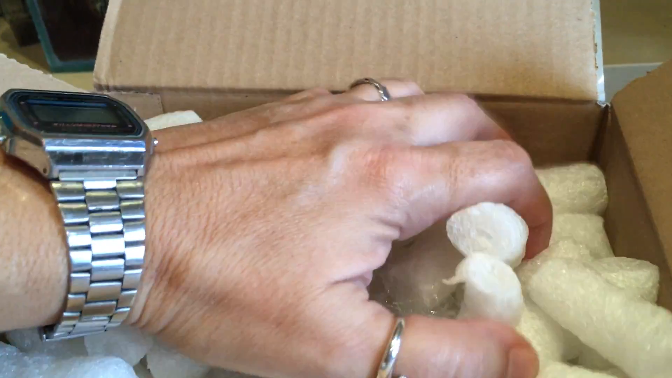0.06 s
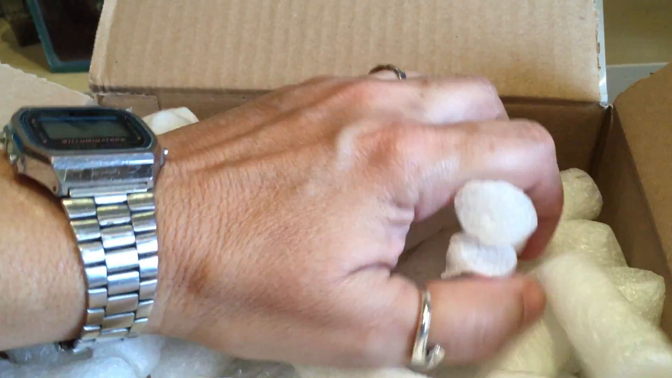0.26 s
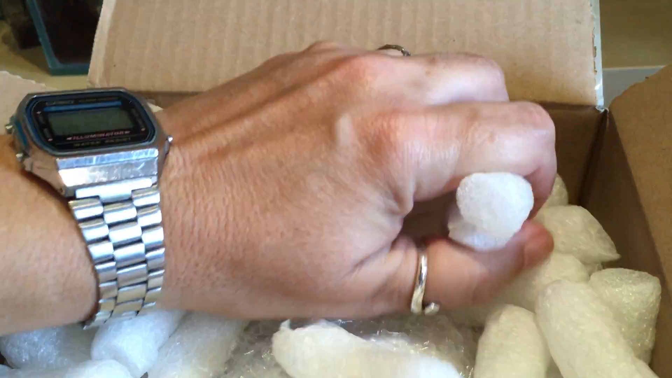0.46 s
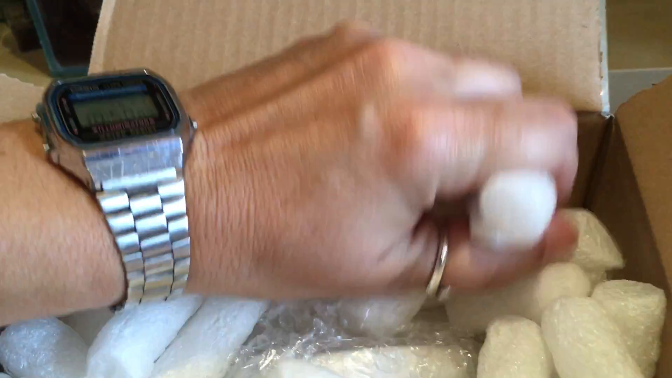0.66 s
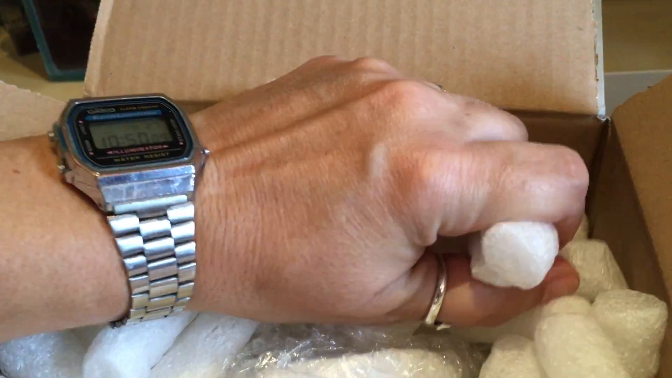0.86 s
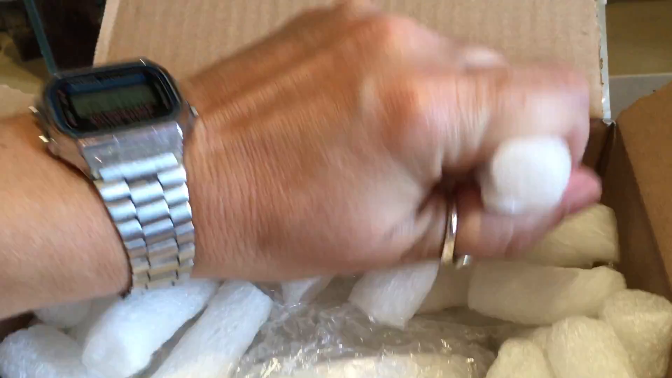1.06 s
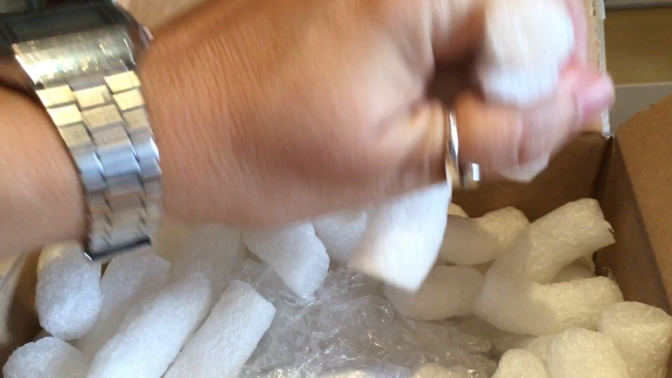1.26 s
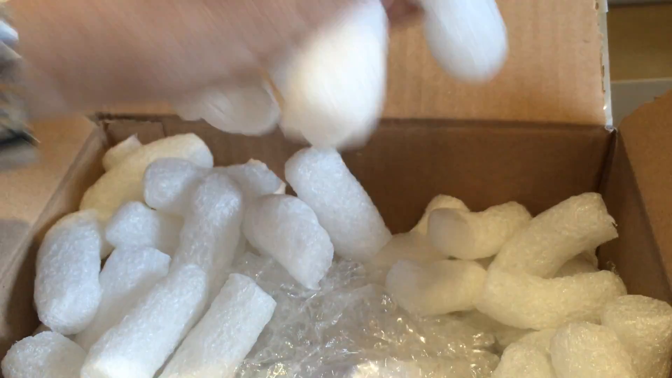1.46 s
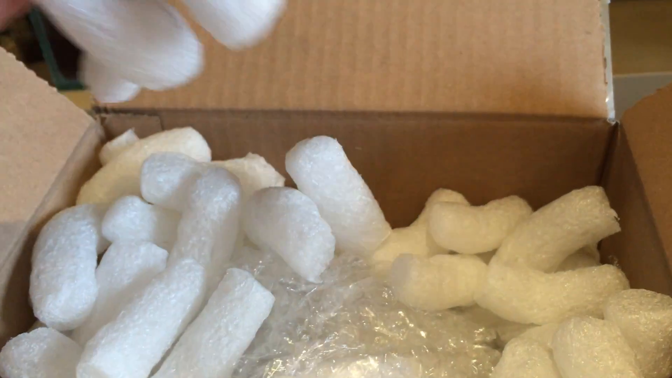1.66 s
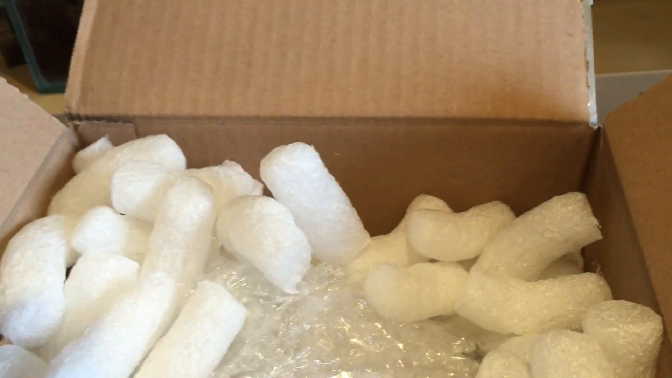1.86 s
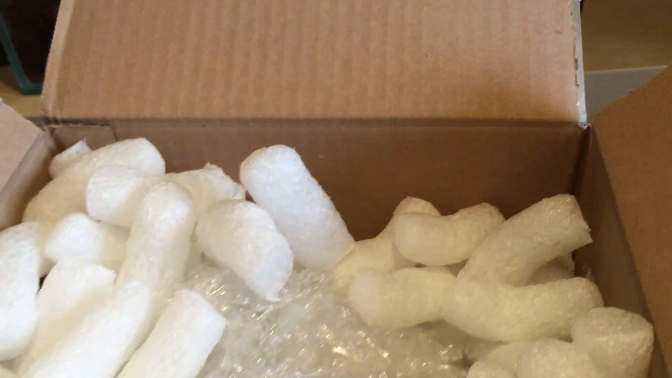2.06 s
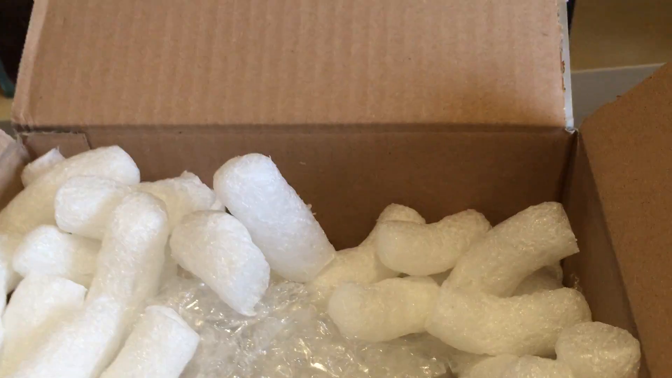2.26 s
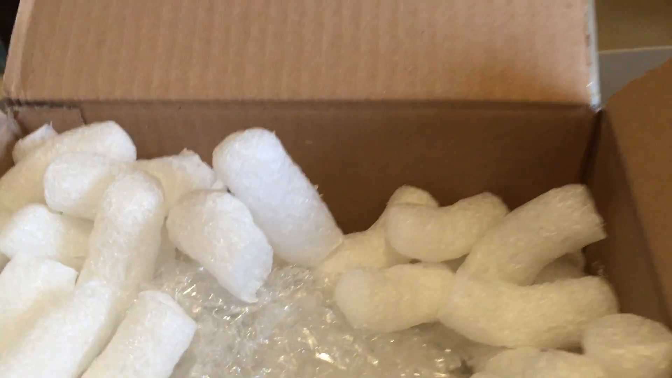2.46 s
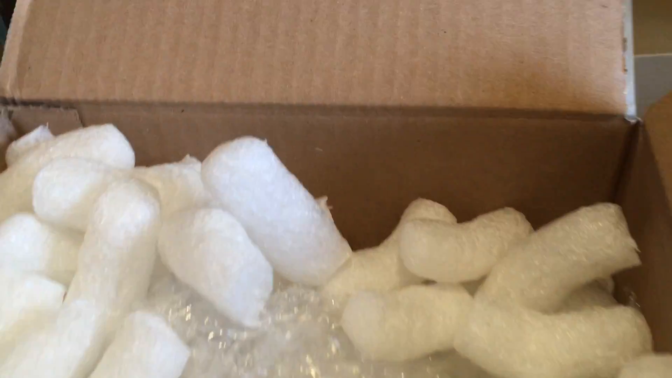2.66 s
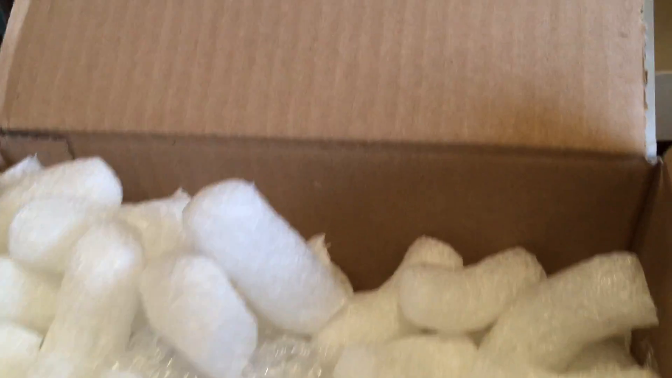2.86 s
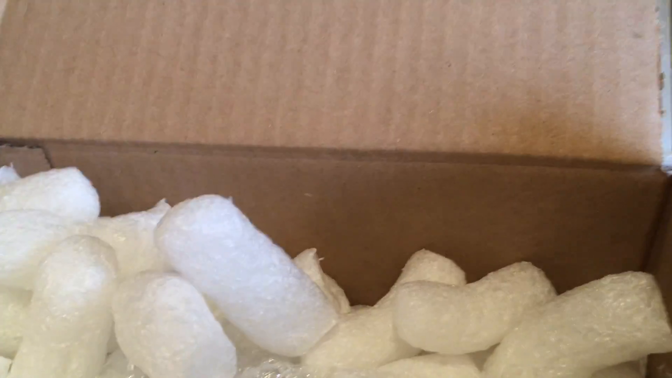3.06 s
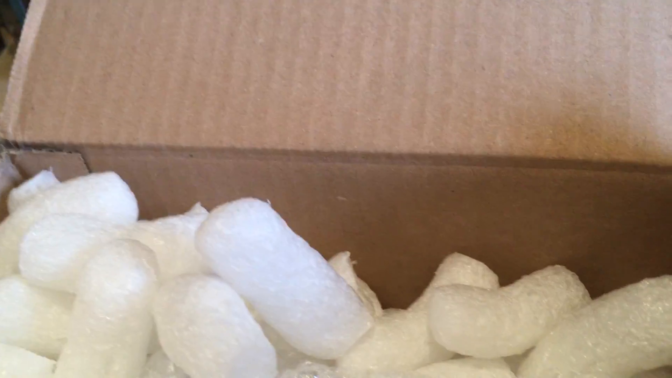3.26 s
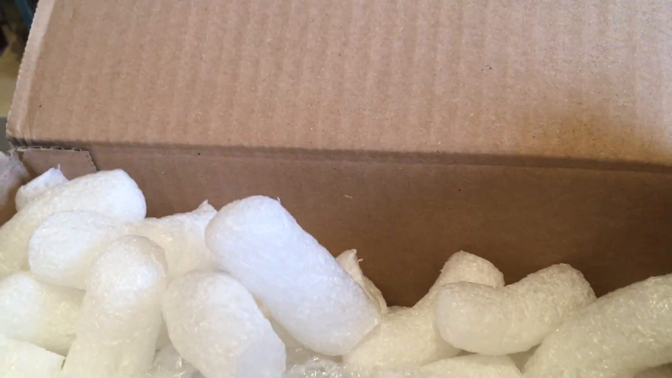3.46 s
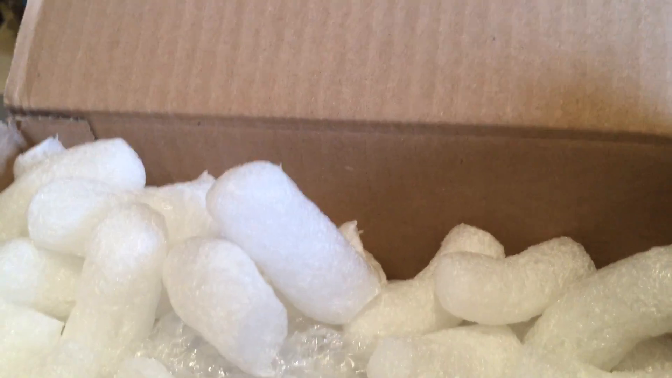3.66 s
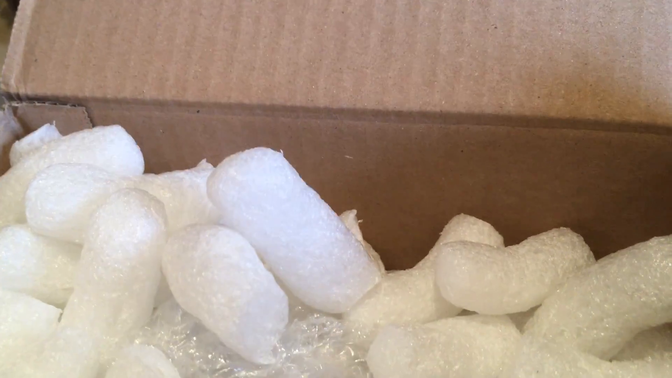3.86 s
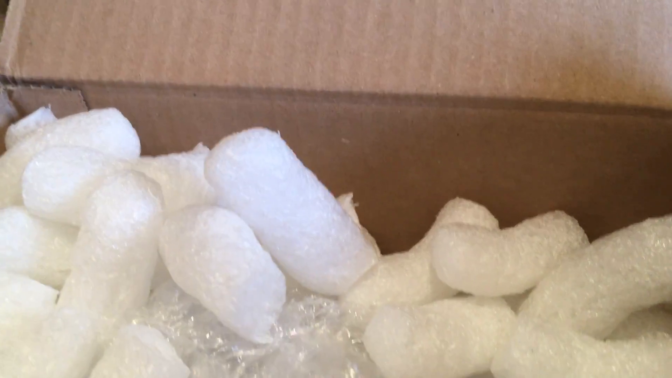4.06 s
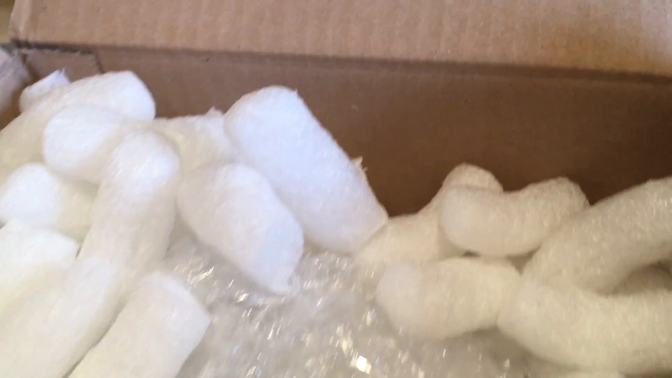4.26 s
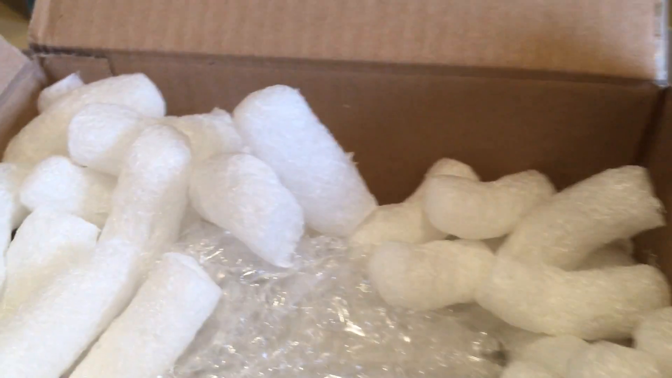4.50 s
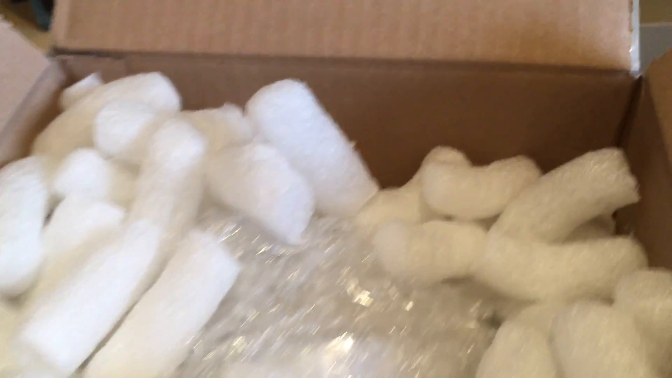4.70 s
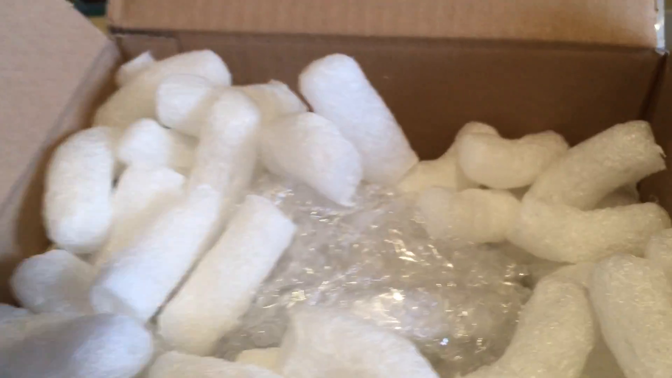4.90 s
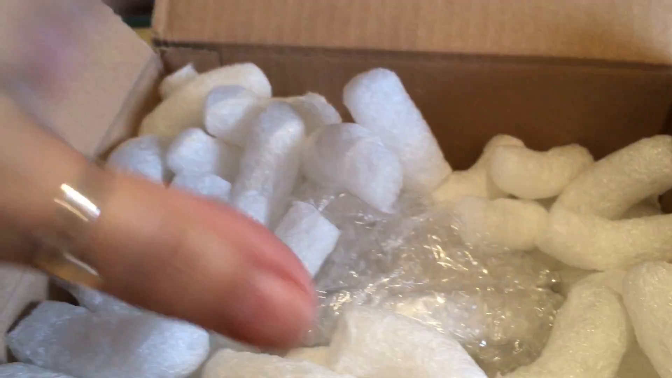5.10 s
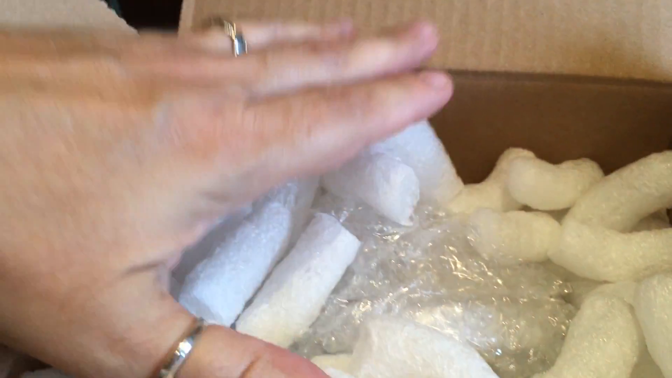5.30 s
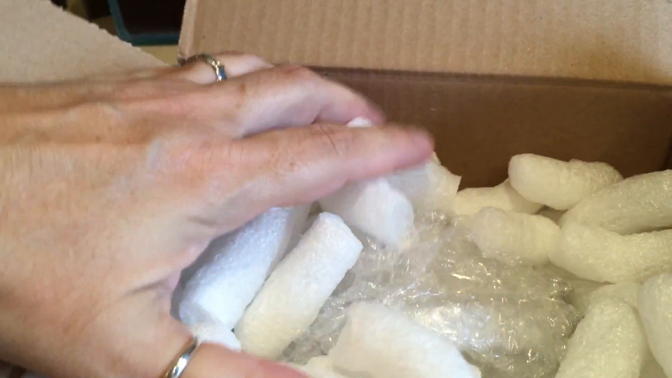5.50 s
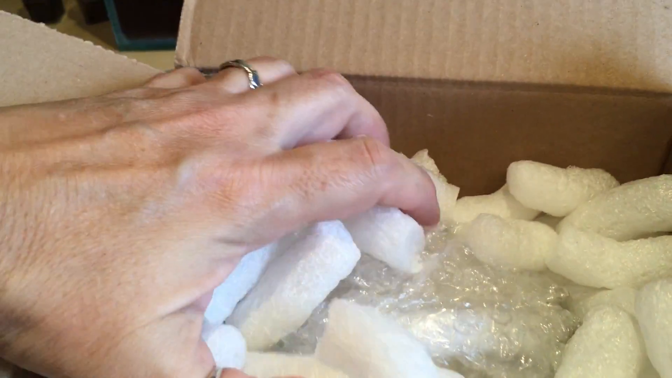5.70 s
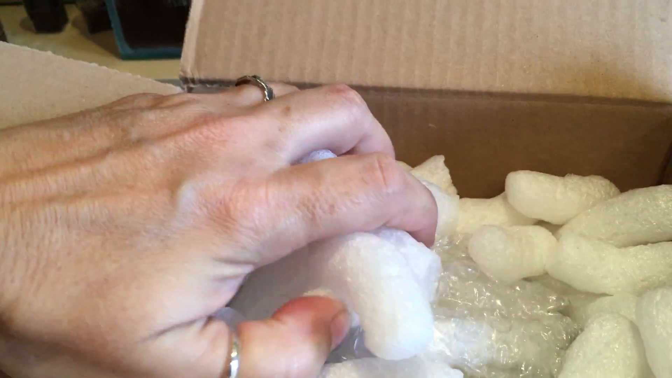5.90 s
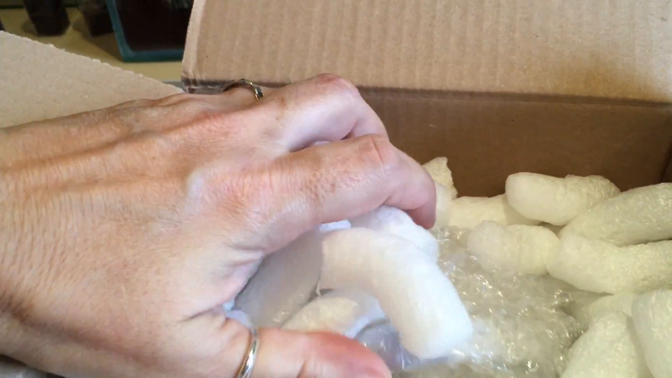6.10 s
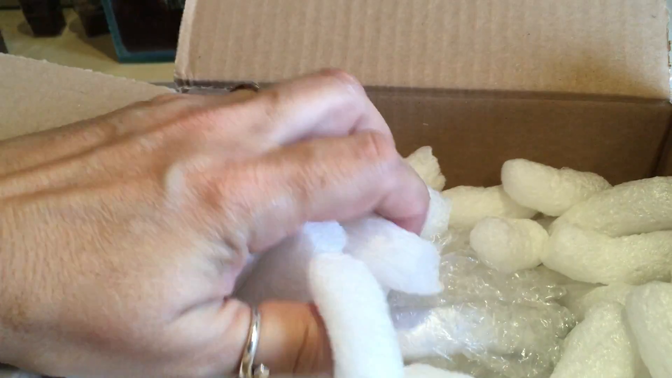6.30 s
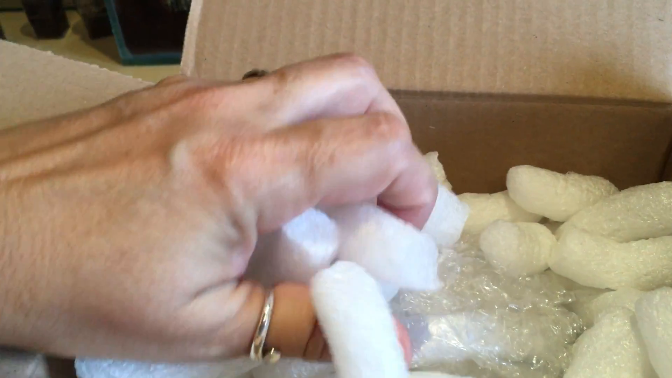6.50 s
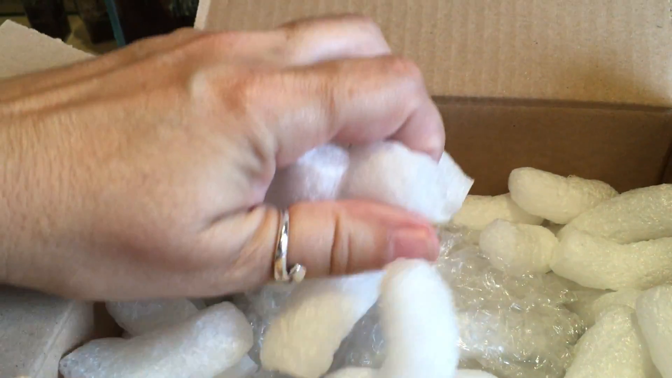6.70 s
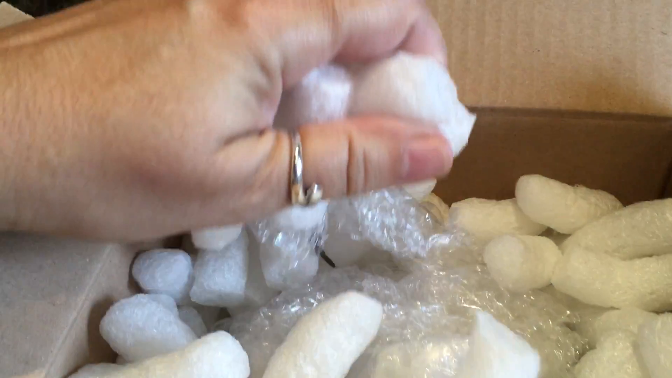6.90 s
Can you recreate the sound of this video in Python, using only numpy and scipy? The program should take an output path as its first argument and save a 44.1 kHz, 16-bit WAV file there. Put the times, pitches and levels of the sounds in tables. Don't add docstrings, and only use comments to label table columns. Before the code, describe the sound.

Foam packing pieces and plastic film crackle, crunch and snap under a squeezing hand, pause for faint bin knocks and scrapes, then crunch again.

```python
import sys
import numpy as np
from scipy import signal
from scipy.io import wavfile

SR = 44100
rng = np.random.default_rng(int(sys.argv[2]) if len(sys.argv) > 2 else 0)


def rack_gain(trim_db):
    fader = np.asarray(trim_db, float)
    return 10 ** (fader / 20)


def master(y):
    cut = np.clip(np.atleast_2d(y).T, -1, 1)
    pcm = np.round(cut * 32767)
    wavfile.write(sys.argv[1], SR, pcm.astype(np.int16))


N = 306336
TIME = np.arange(N) / SR
COARSE_STEP = 32
COARSE = TIME[::COARSE_STEP]

# time_s, crackle_db, dull_against_crackle_db
STIR = [(0, -38.5, 0.5), (0.58, -41.5, -3.5), (0.73, -47.5, -9), (1.1, -43, -5.5), (1.25, -50, -4),
        (1.5, -56.5, -9.5), (2.05, -60.5, -9.5), (2.4, -75, -2), (2.6, -65, -10), (3.05, -58, -6),
        (3.41, -65, -10), (4.15, -66.5, -2.5), (4.4, -72.5, -2.5), (5.2, -86, 7), (5.39, -90, -16),
        (5.4, -49.5, 2.5), (6.0, -45.5, -11), (6.95, -46.5, -4.5)]
# peak_s, rise_s, fall_s, crackle_db, dull_against_crackle_db
SQUEEZES = [(0.036, 0.29, 0.34, -35, -4), (0.2, 0.074, 0.17, -37.5, -3), (0.32, 0.12, 0.18, -35, -4.5),
            (0.413, 0.27, 0.014, -35.5, -1), (0.517, 0.23, 0.064, -37, -1), (0.634, 0.06, 0.12, -35.5, -1),
            (0.803, .1, 0.11, -38, -0.5), (0.934, 0.24, 0.19, -40, -0.5), (1.041, 0.096, 0.15, -38.5, 0),
            (5.425, 0.024, 0.16, -38.5, -6), (5.66, 0.16, 0.19, -39, -1), (5.758, 0.2, 0.11, -37.5, 0.5),
            (5.85, 0.07, 0.29, -36, 0.5), (5.926, .09, .025, -28, -11), (6.153, 0.19, 0.09, -34.5, -1.5),
            (6.258, .07, 0.54, -36, -0.5), (6.399, 0.026, 0.18, -32.5, -4.5), (6.6, 0.08, 0.25, -45, -8),
            (6.666, 0.26, 0.072, -48, 3.5)]
# peak_s, rise_s, fall_s, crackle_db, dull_against_crackle_db
SHIFTS = [(1.6, .2, .2, -64, -2), (1.76, .02, .08, -59, 1), (2.104, .005, .06, -59, 4),
          (2.17, .06, .08, -60, -12), (2.245, .02, .15, -56, -10), (2.306, .05, .05, -52, -12),
          (2.478, .1, .015, -57, -1), (2.732, .2, .25, -59, -2), (2.847, .005, .15, -59, 1),
          (3.14, .3, .1, -54, -1.5), (3.274, .005, .12, -57, 0), (3.437, .004, .06, -54, -5),
          (3.61, .3, .3, -59, 3), (3.852, .005, .15, -59, -4), (3.95, .005, .1, -57, 0),
          (4.2, .004, .05, -56, -2), (4.252, .005, .2, -59, -4), (4.45, .004, .14, -56, 3),
          (4.544, .05, .08, -66, 6), (4.74, .004, .06, -53, 2.5), (4.89, .1, .5, -67, -3.5),
          (5.354, .003, .3, -61, -3), (3.49, .003, .35, -57, 0), (3.751, .003, .2, -61, -7)]
# pitch_hz, level_db (per Hz)
DULL_TONE = [(180, 0), (300, -5), (432, -3), (1270, -1.5), (1760, -3), (2040, -0.5), (3370, -3), (4910, -2),
             (6000, 9), (7800, -25.5), (13200, -120)]
# pitch_hz, level_db (per Hz)
BRIGHT_TONE = [(2350, -49), (4000, -8.5), (4900, -6), (5970, 2), (10400, 0), (11400, 4), (15000, 7.5),
               (16000, 2.5)]
# time_s, level_db
FILM_SLIDE = [
    (1.1, -60),
    (1.3, -57),
    (1.62, -54),
    (1.7, -63),
    (2.1, -73),
    (2.2, -90),
]
# time_s, peak_db, low_part_db, ringing_part_db, ringing_hz
GRIP_SNAPS = [ (0.077, -22, -22, -8, 3400), (0.299, -11, -22, -24, 2230), (0.883, -26, -10, -12, 2650),
              (1.151, -21, -32, -22, 2200), (1.209, -28, -24, -8, 5430), (5.422, -13, -30, -26, 3300),
              (5.637, -23, -12, -14, 2300), (5.76, -20, -12, -14, 1880), (5.837, -22, -16, -8, 4400),
              (6.101, -17, -34, -16, 3400), (6.14, -18, -18, -19, 2000), (6.247, -23, -22, -8, 2150),
              (6.432, -17, -32, -13, 2870), (6.52, -21, -30, -11, 3500), (6.583, -11, -38, -23, 3000),
              (0.405, -21, -7, -13, 2090), (0.6295, -5, -34, -19, 3600), (5.351, -38, -6, -18, 3000),
              (5.4, -36, -5, -8, 2300), (6.493, -25, -28, -3, 3550), (5.907, -18, -40, -1, 4200),
              (5.918, -11, -26, -8, 2490), (5.9235, -12, -40, -7, 1850), (5.929, -11, -40, -7, 3500)]
# time_s, peak_db, low_part_db, ringing_part_db, ringing_hz
LIFT_TICKS = [(1.3758, -32, -16, -11, 3950), (1.493, -32.5, -31, -12, 3020), (1.5898, -31, -36, -17, 2920),
              (1.629, -36, -23, -17, 3320), (1.6784, -46, -32, -21, 4570), (1.7552, -29, -37, -21, 2810),
              (1.7684, -37.5, -26, -4, 4200), (1.8, -28.5, -41, -19, 3120), (1.8532, -33, -40, -16, 2970),
              (1.935, -32.5, -37, -18, 3970), (2.1033, -39, -24, -5, 4480), (2.143, -41, -36, -28, 2760),
              (2.1807, -39, -33, -29, 2850), (2.2383, -40, -34, -24, 4480), (2.2597, -39, -35, -10.5, 3800),
              (2.2952, -34, -32, -13, 4590), (2.3054, -40, -34, -12, 2740), (2.3358, -38, -29, -16, 2610),
              (2.4313, -36, -36, -11, 5300), (2.4545, -39, -28, -15, 2710), (2.4773, -28.5, -26, -21, 1800)]
# time_s, peak_db, low_part_db,
# ringing_part_db, ringing_hz
BIN_TICKS = [(1.339, -36, -24, -14, 3390), (2.8454, -40, -15, -14, 1900), (3.1128, -44.5, -21, -7.5, 1910),
             (3.272, -33.5, -16, -19, 1820), (3.435, -39, -26, -13, 1890), (3.488, -40, -16, -11, 1900),
             (3.7495, -50, -26, -13, 5480), (3.8531, -39, -23, -18, 5460), (3.9504, -46, -27, -5, 2060),
             (4.0467, -36.5, -35, -21, 2680), (4.2002, -39, -23, -12, 2540), (4.2492, -42, -26, -5, 5380),
             (4.4486, -31.5, -17, -16, 1920), (4.6978, -43, -18, -5, 5200), (4.7391, -39, -19, -21, 1960),
             (4.789, -40, -14, -26, 1910), (5.019, -56, -13, -4.5, 2580), (5.1114, -57, -15, -8, 2560),
             (6.5576, -8.5, -38, -19.5, 2270), (6.6462, -27, -12.5, -12, 2200), (6.8547, -32, -8, -6, 3610),
             (6.8997, -28, -13, -12.5, 2930)]
# time_s, rumble_db
BUMPS = [(0.01, -44.5), (0.146, -41), (0.413, -40.5), (0.519, -39.5), (0.632, -47.5), (0.853, -43),
         (1.04, -45), (1.43, -53.5), (1.6, -53.5), (1.77, -59), (4.8, -59), (5.364, -41.5), (5.411, -46),
         (5.45, -45.5), (5.5, -45), (5.611, -43.5), (5.68, -52), (5.768, -38), (5.941, -48), (6.03, -43.5),
         (6.09, -41.5), (6.149, -52.5), (6.282, -46), (6.52, -50), (6.782, -50), (6.91, -62)]
# pitch_hz, level_db (per Hz)
RUMBLE_TONE = [(18, -47), (30, -59), (68, 6.5), (92, 4), (145, 1.5), (209, 2), (364, -16), (500, -20.5),
               (650, -40), (1100, -120)]
# pitch_hz, level_against_bump_db, time_to_fall_60_db_s
WALLS = [(97, -4.5, 0.19), (167, -7.5, 0.093)]
# start_s, hold_s, fall_s, level_db
SCRAPES = [
    (2.852, 0.0057, .035, -57),
    (3.125, .002, 0.098, -61),
    (3.277, 0.012, 0.086, -53),
    (3.492, .15, 0.065, -56.5),
    (4.452, 0.076, 0.12, -59.5),
    (4.74, .05, .04, -69),
]
# pitch_hz, level_db, time_to_fall_60_db_s
BIN_RINGS = [(167, -4.5, 0.44), (260.5, 2, 0.098), (570, -26, .04), (656, -3, 0.16), (872, 1.5, 0.076),
             (980, -7, 0.07), (1132, -6.5, 0.095), (1210, -12.5, 0.073), (1690, -4, 0.079),
             (1884, -0.5, 0.061), (2000, -6, 0.051), (2100, -20, .03)]
# time_s, pitch_hz, peak_db, time_to_fall_60_db_s
KNOCKS = [
    (2.982, 260, -38.5, 0.097),
    (3.012, 166, -43, 0.27),
    (3.13, 257, -38, 0.095),
    (3.163, 168, -40.5, 0.25),
    (3.275, 180, -59, .08),
    (4.792, 860, -40, 0.029),
    (4.145, 790, -55, 0.043),
    (5.31, 1950, -67.5, .03),
    (5.31, 3130, -60, 0.033),
]
# pitch_hz, level_db (per Hz)
ROOM_TONE = [(18, -56), (30, -16.5), (165, -11.5), (199, -22), (345, -22), (461, -25.5), (666, -32),
             (2830, -40), (9970, -38), (10800, -39), (16000, -37.5)]
# pitch_hz, width_hz, level_db
HUM = [(100, 9.4, -66), (201, 23, -73.5)]
# start_s, end_s, pitch_hz, width_hz, level_db
WHINES = [
    (2.15, 2.36, 1530, 12, -78),
    (1.47, 1.66, 950, 350, -70),
    (1.5, 2.0, 2860, 60, -84),
    (4.98, 5.33, 2860, 12, -84),
    (5.19, 5.26, 2560, 40, -85),
    (5.13, 5.36, 10870, 40, -83),
]
# pitch_hz, width_hz, depth_0_to_1
HOUSING_DIPS = [(4870, 1240, 0.52), (7680, 1340, 0.37), (10430, 780, 0.49)]


def rms_one(x):
    return x / np.sqrt(np.mean(x ** 2) + 1e-20)


def in_time(rows):
    s, *columns = np.transpose(rows)
    return [np.interp(TIME, s, column) for column in columns]


def drift(rate_hz):
    r = np.exp(-2 * np.pi * rate_hz / SR)
    noise = rng.standard_normal(N + SR)
    return rms_one(signal.lfilter([1], [1, -2 * r, r * r], noise)[SR:])


def die_away(clicks, tail_s):
    return signal.lfilter([1], [1, -np.exp(-1 / (tail_s * SR))], clicks)


def ring(clicks, hz, t60):
    r, w = rack_gain(-60 / (t60 * SR)), 2 * np.pi * hz / SR
    return signal.lfilter([0, np.sin(w)], [1, -2 * r * np.cos(w), r * r], clicks + 1e-18)


def resonance(x, hz, width):
    r = np.exp(-np.pi * width / SR)
    feed = np.array([1, 0, -1]) * (1 - r * r) / 2
    return signal.lfilter(feed, [1, -2 * r * np.cos(2 * np.pi * hz / SR), r * r], x)


def band(x, low_hz, high_hz):
    sos = signal.butter(2, [low_hz, min(high_hz, .45 * SR)], "band", fs=SR, output="sos")
    return signal.sosfilt(sos, x + 1e-18)


def colour(source, tone):
    hz, db = np.transpose(tone)
    edges = hz[0] * 2 ** np.arange(0, np.log2(hz[-1] / hz[0]) + .5, .5)
    total = 0
    for low, high in zip(edges, edges[1:]):
        level_db = np.interp(np.log(np.sqrt(low * high)), np.log(hz), db)
        total = total + rack_gain(level_db) * band(source(), low, high)
    return rms_one(total)


def swell(peak_s, rise_s, fall_s, db, hold_s=0):
    early = np.maximum(peak_s - COARSE, 0) / max(rise_s, .002)
    late = np.maximum(COARSE - peak_s - hold_s, 0) / max(fall_s, .002)
    return rack_gain(2 * (db - 20 * np.minimum(early + late, 8)))


def hand():
    stir_db, dull_part_db = (column[::COARSE_STEP] for column in in_time(STIR))
    bright = rack_gain(2 * stir_db)
    dull = rack_gain(2 * (stir_db + dull_part_db))
    for s, rise_s, fall_s, db, part_db in [*SQUEEZES, *SHIFTS]:
        power = swell(s, rise_s, fall_s, db)
        bright = bright + power
        dull = dull + power * rack_gain(2 * part_db)
    rumble = rack_gain(2 * -52) * (dull / rack_gain(-80)) ** .6
    for s, db in BUMPS:
        rumble += swell(s, rise_s=0.028, fall_s=0.15, db=db - 3.5)
    return [np.interp(TIME, COARSE, 10 * np.log10(power)) for power in (dull, bright, rumble)]


def crackle(tone, cells, tail_s, rub_db, own_db):
    def burst():
        strength = cells * rack_gain(own_db * rng.uniform(-0.39, 1, N))
        sharp = rms_one(die_away(strength, tail_s))
        crumple = rms_one(die_away(strength, .005))
        rub = rack_gain(rub_db + 3.1 * drift(4.5))
        return (sharp + .45 * crumple + rub) * rng.standard_normal(N)
    return colour(burst, tone)


def foam(dull_db, bright_db):
    cells_per_s = 850.0
    born = rng.random(N) < cells_per_s / SR
    cells = born * rack_gain(4.0 * np.minimum(rng.exponential(1, N), 3.5))
    dull = crackle(DULL_TONE, cells, tail_s=.0006, rub_db=0.0, own_db=10.0)
    bright = crackle(BRIGHT_TONE, cells, tail_s=.0002, rub_db=2.0, own_db=6.0)
    return rack_gain(dull_db + 0.77) * dull + rack_gain(bright_db + 0.83) * bright


def snaps():
    rows = np.concatenate([GRIP_SNAPS, LIFT_TICKS, BIN_TICKS])
    s, peak_db, low_db, ring_db, ring_hz = np.transpose(rows)
    peak_db = peak_db + 0.5
    at = ((s + .001) * SR).astype(int)
    out = np.zeros(N)
    # low_hz, high_hz, level_db, tail_s
    parts = [(600, 2300, low_db + 15.5, 0.00042),
             (5560, 10200, -3.0, 0.00037),
             (10800, 33000, 1.2, 0.00036)]
    for low_hz, high_hz, part_db, tail_s in parts:
        clicks = np.zeros(N)
        clicks[at] = rack_gain(peak_db + part_db)
        random_signs = np.sign(rng.standard_normal(N))
        out += band(die_away(clicks, tail_s) * random_signs, low_hz, high_hz)
    since = np.arange(SR // 100) / SR
    for i, db, hz in zip(at, peak_db + ring_db + 4.5, ring_hz):
        shape = np.minimum(since * hz / 2, 1) * rack_gain(3 - 60 * since * hz / 18)
        tone = rack_gain(db) * shape * np.sin(2 * np.pi * hz * since)
        out[i:i + len(since)] += tone[:N - i]
    return out


def reflections(x):
    since = np.arange(SR // 8) / SR
    tail = band(rng.standard_normal(len(since)) * rack_gain(-60 * since / .05), 400, 12000)
    return rack_gain(-8) * signal.fftconvolve(x, tail / np.sqrt(np.sum(tail ** 2)))[:N]


def film():
    level = rack_gain(in_time(FILM_SLIDE)[0]) * (TIME > FILM_SLIDE[0][0])
    return level * rms_one(band(rng.standard_normal(N), 11500, 15000))


def box(rumble_db):
    lumpy = rack_gain(2.5 * drift(14.0))
    boom = colour(lambda: lumpy * rng.standard_normal(N), RUMBLE_TONE)
    boom_level = np.sqrt(np.maximum(rack_gain(2 * rumble_db) - rack_gain(-124.0), 0))
    s, db = np.transpose(BUMPS)
    pushes = np.zeros(N)
    pushes[((s - .01).clip(0) * SR).astype(int)] = rack_gain(db)
    thud = sum(rack_gain(wall_db + 6) * ring(pushes, hz, t60) for hz, wall_db, t60 in WALLS)
    thud = signal.lfilter([.03], [1, -.97], thud)
    return boom_level * boom + band(thud, 45, 500)


def bin_sounds():
    power = sum(swell(s, 0.0038, fall_s, db, hold_s) for s, hold_s, fall_s, db in SCRAPES)
    level = np.interp(TIME, COARSE, np.sqrt(power))
    slips_per_s = 1800.0
    slips = (rng.random(N) < slips_per_s / SR) * rng.standard_normal(N)
    ringing = sum(rack_gain(db) * ring(slips, hz, t60) for hz, db, t60 in BIN_RINGS)
    out = rack_gain(3.5) * level * rms_one(ringing)
    for s, hz, db, t60 in KNOCKS:
        since = np.maximum(TIME - s, 0)
        shape = rack_gain(db - 60 * since / t60) * np.minimum(since * hz / 2, 1)
        out += shape * np.sin(2 * np.pi * hz * since)
    return out


def room():
    out = rack_gain(-66) * colour(lambda: rng.standard_normal(N), ROOM_TONE)
    for hz, width, db in HUM:
        hum = resonance(rng.standard_normal(N), hz, width)
        out += rack_gain(db) * rms_one(resonance(hum, hz, 2 * width))
    for start, end, hz, width, db in WHINES:
        gate = np.clip(np.minimum(TIME - start, end - TIME) / 0.025, 0, 1)
        whine = resonance(rng.standard_normal(N), hz, width)
        out += rack_gain(db) * gate * rms_one(resonance(whine, hz, width))
    return out


def scene():
    dull_db, bright_db, rumble_db = hand()
    sharp = snaps()
    packing = foam(dull_db, bright_db) + film() + sharp + reflections(sharp)
    return (packing + box(rumble_db) + bin_sounds() + room())[None]


def roll_off(x):
    return signal.sosfilt(signal.butter(12, 17040, fs=SR, output="sos"), x)


def record(dry):
    for hz, width, depth in HOUSING_DIPS:
        dry = dry - np.clip(depth, 0, 1) * resonance(dry, hz, width)
    top_cut = signal.ellip(12, .5, 50, 15800, fs=SR, output="sos")
    return roll_off(signal.sosfilt(top_cut, dry))


dry = scene()
out = record(dry)
master(out)
```